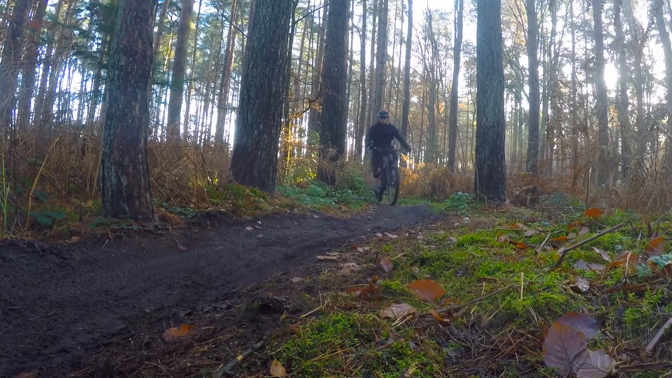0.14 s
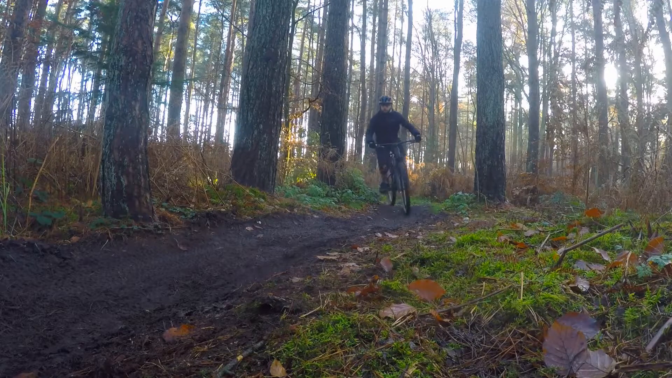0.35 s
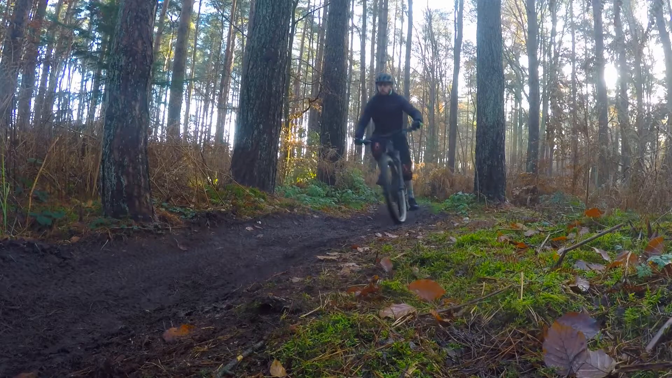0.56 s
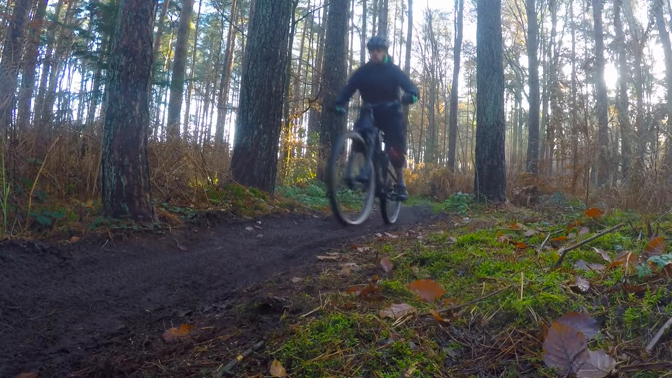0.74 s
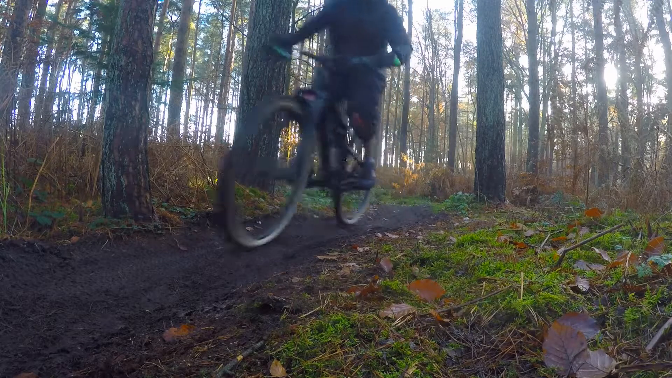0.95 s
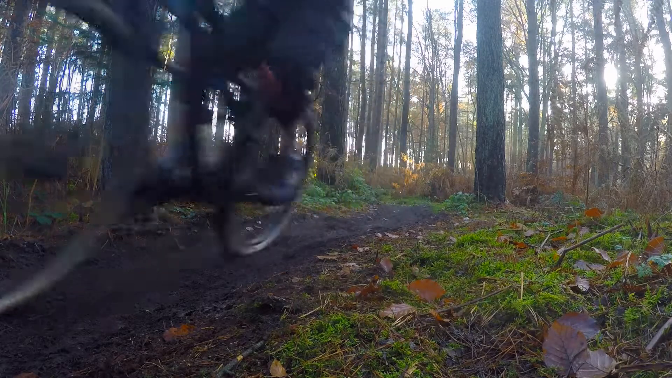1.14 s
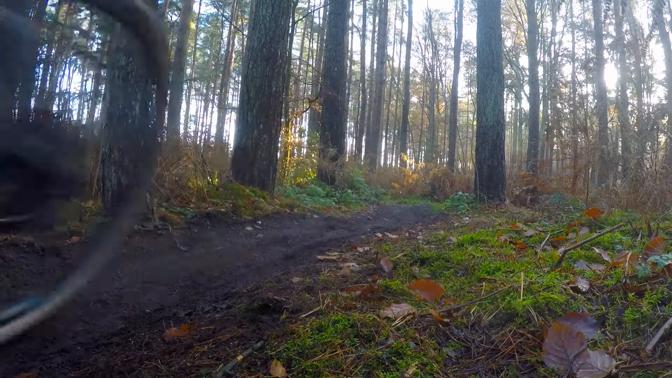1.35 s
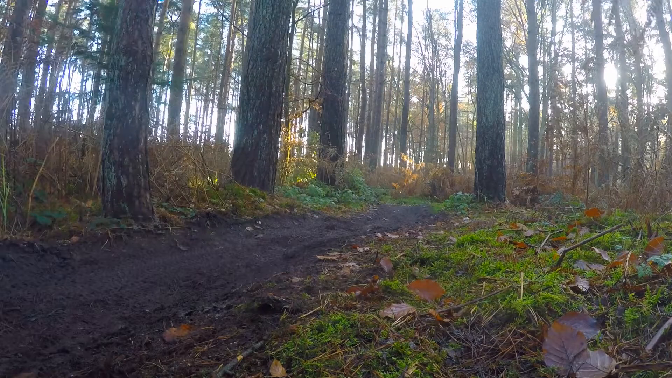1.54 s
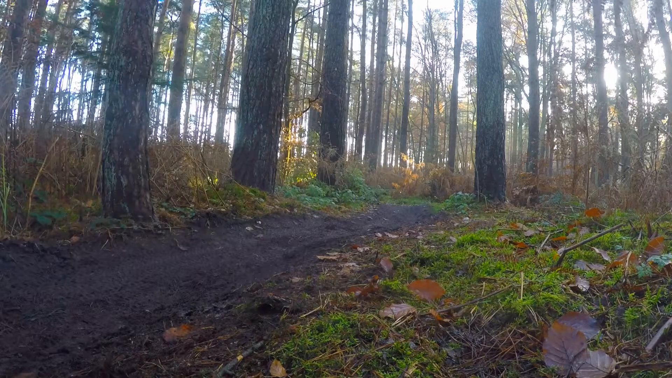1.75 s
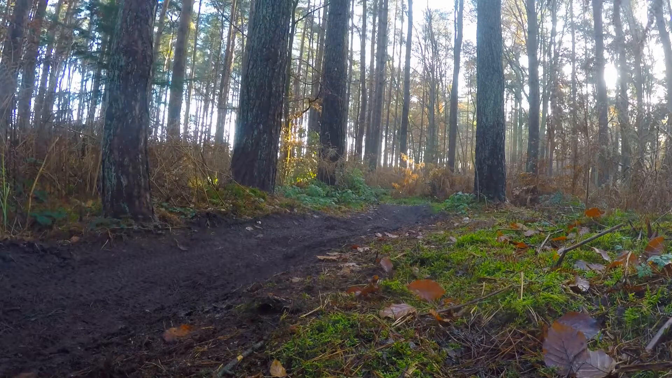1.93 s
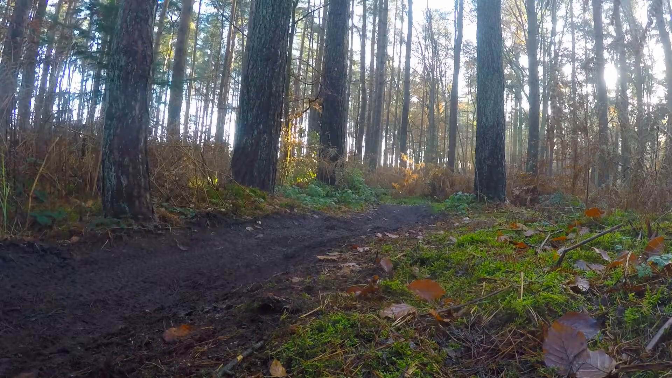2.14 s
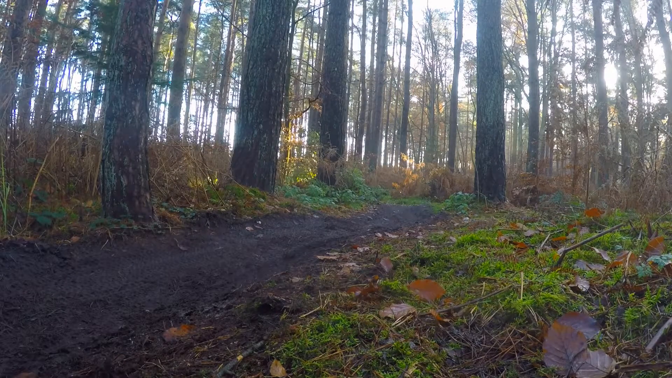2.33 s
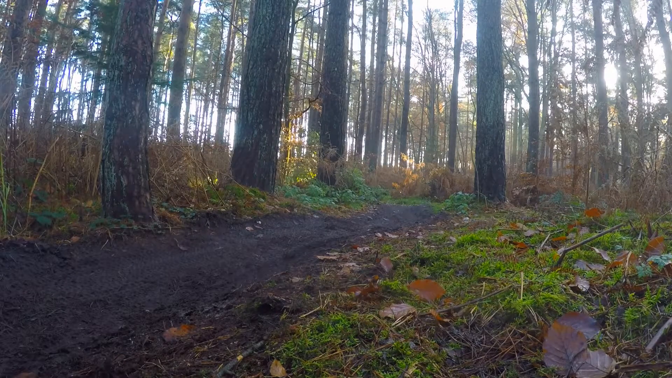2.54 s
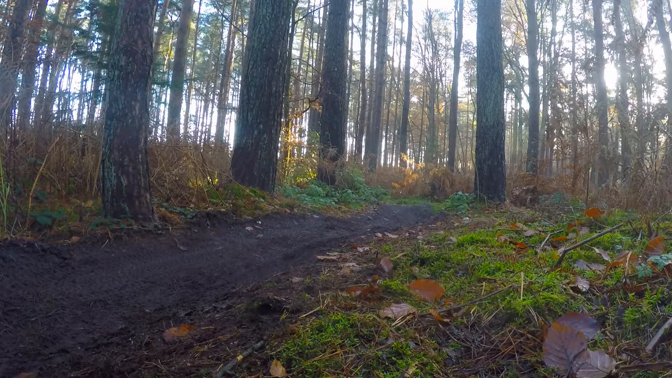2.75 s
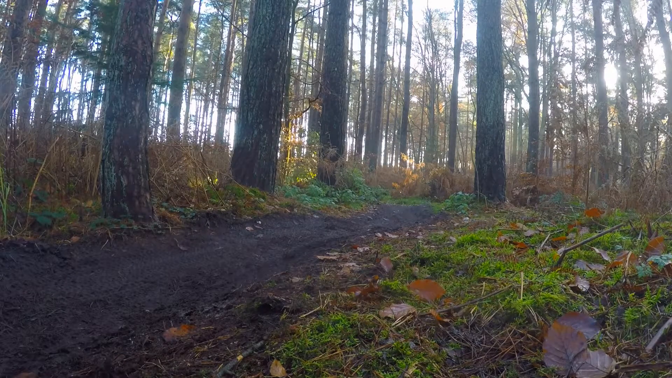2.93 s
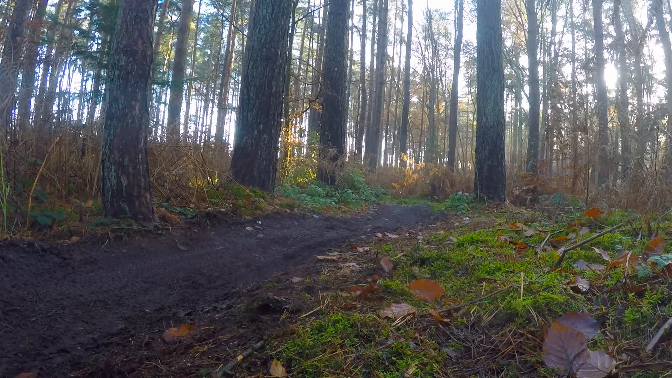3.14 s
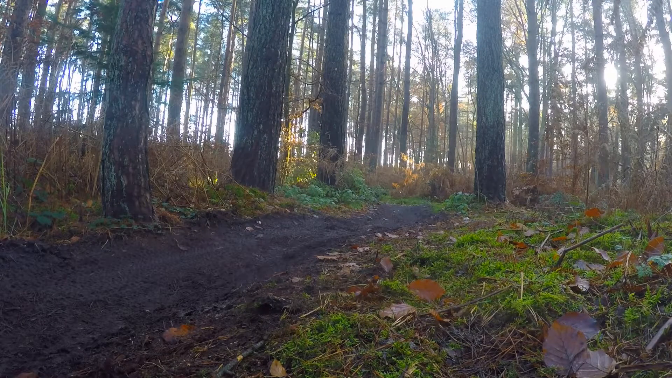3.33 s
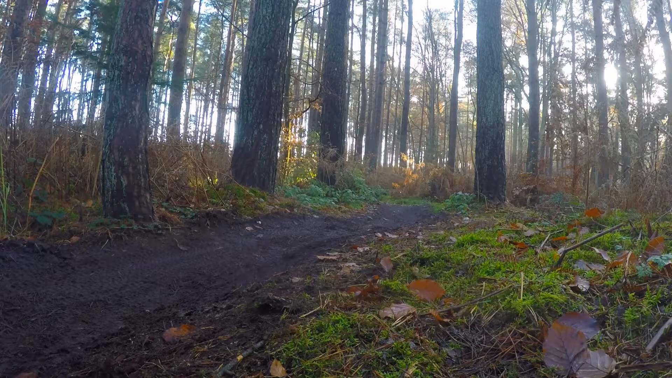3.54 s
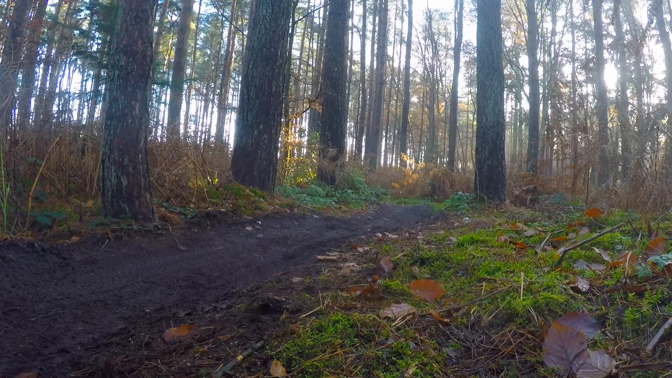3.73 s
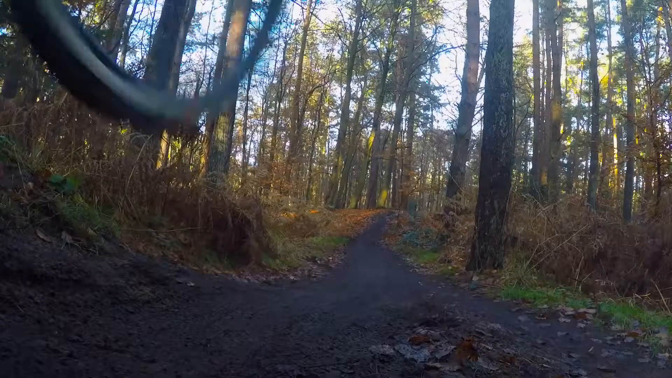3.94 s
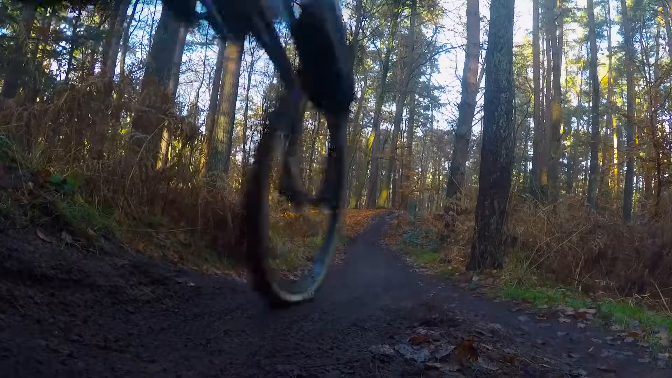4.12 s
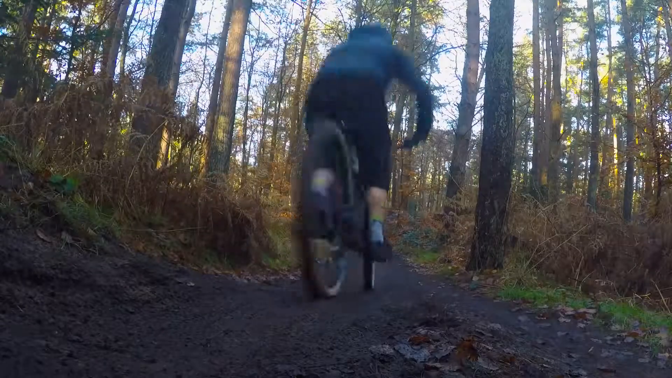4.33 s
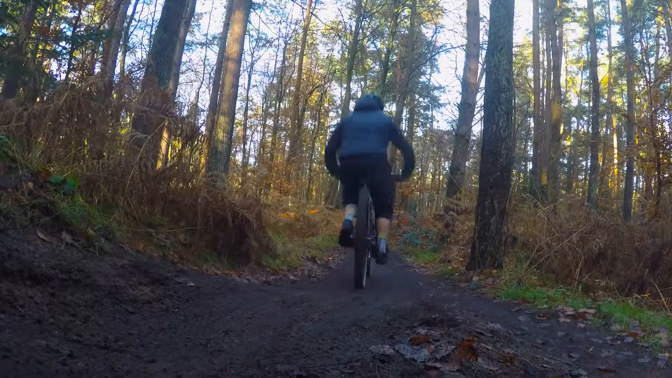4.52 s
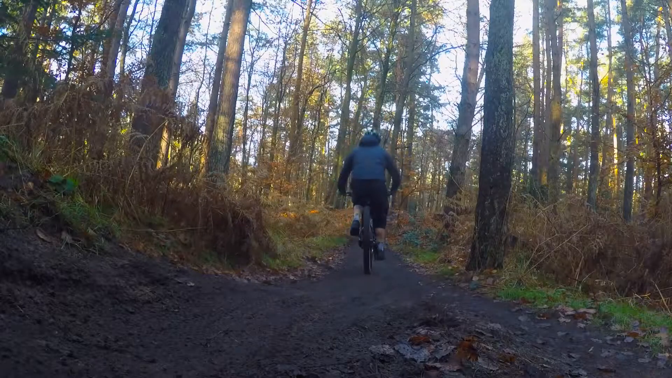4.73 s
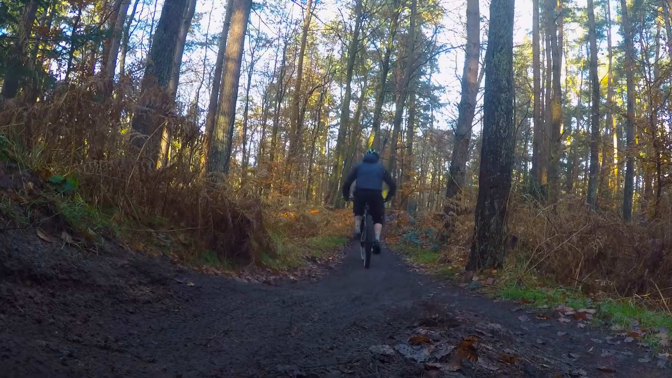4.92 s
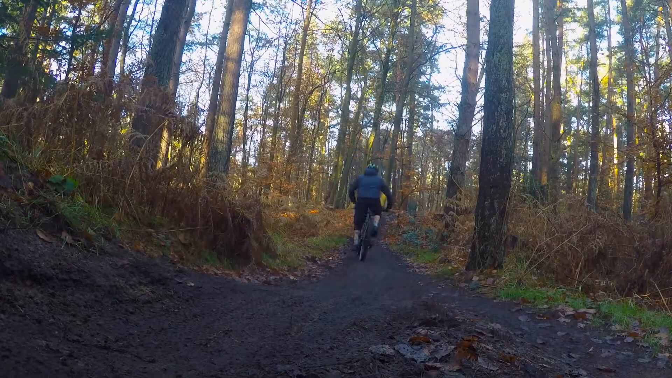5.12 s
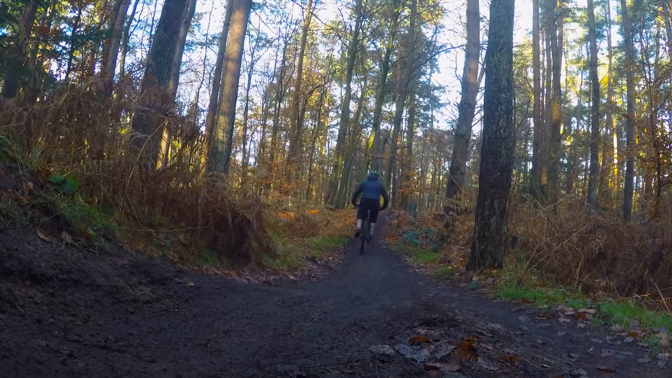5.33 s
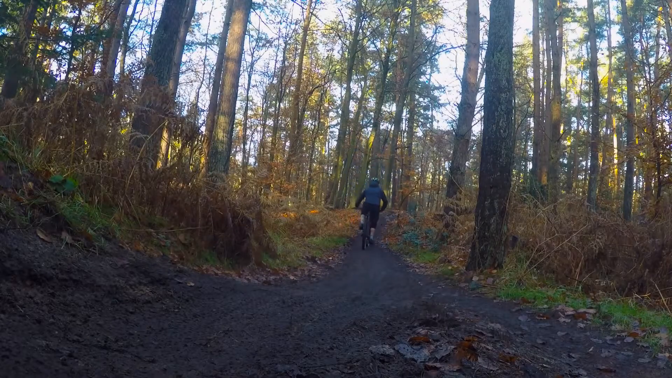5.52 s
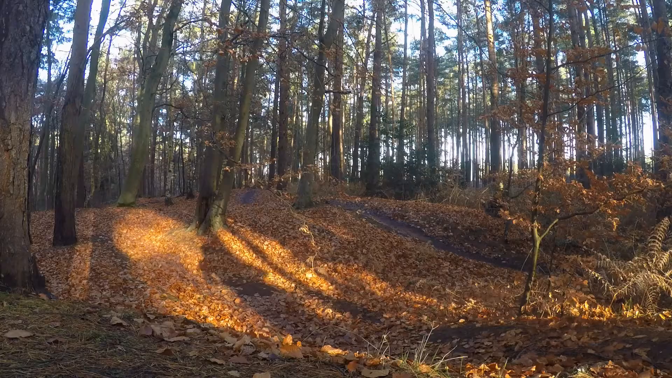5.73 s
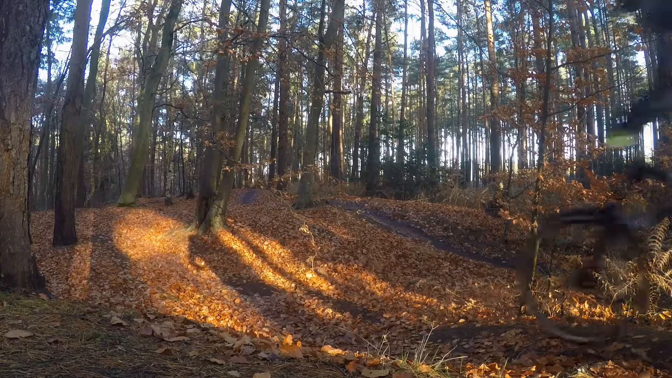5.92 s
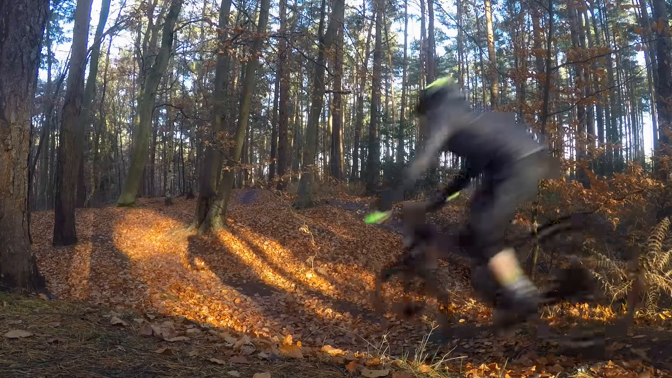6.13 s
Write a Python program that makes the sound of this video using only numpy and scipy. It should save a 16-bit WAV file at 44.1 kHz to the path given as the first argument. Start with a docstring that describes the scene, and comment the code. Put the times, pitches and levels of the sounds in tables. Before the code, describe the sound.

A mountain bike coasts toward a microphone beside a dirt forest trail and passes close, tyres humming and crunching, freehub ticking fast, chain rattling over bumps. A twig cracks as it fades. A second pass lands a jump with two heavy thumps and clatters away, then a quieter third pass ticks by. Wind buffets the microphone over a soft woodland hiss, with a light echo from the trees.

```python
"""Mountain bike on a forest trail

A camera microphone lies beside a dirt trail; a bike coasts past three times, 1.4 to 3 m away.
The freehub ratchets, the tyres hum and crunch, bumps and a landing thump the soil and rattle
chain and frame. Trunks scatter the sound back; air buffets the microphone and the camera whines faintly."""
import sys
import numpy as np
from scipy import signal
from scipy.fft import rfft, irfft, next_fast_len
from scipy.io import wavfile
from scipy.ndimage import uniform_filter1d

SR = 44100
rng = np.random.default_rng(int(sys.argv[2]) if len(sys.argv) > 2 else 0)


def int16_out(signal):
    """Quantize to a 16-bit WAV file."""
    q = np.round(np.clip(np.atleast_2d(signal).T, -1, 1) * 32767)
    wavfile.write(sys.argv[1], SR, q.astype(np.int16))


N = 276451
T = np.arange(N) / SR
SPEED_M_S = 5.33

# camera electronics: f/Hz, level/dB
WHINE = [(8600, -76), (8650, -72)]
# soft hiss of the wood: t/s, level/dB
HISS_LEVEL = [(0, -65.5), (1, -62), (2.6, -61.5), (3.8, -59), (4.8, -54), (5.75, -53), (5.8, -63),
              (6.27, -62)]
# eddies at the microphone: t/s, half length/s, level/dB
GUSTS = [(1.55, 0.14, -37.5), (4.918, 0.04, -21), (5.037, 0.063, -30.5), (5.35, 0.025, -34),
         (5.61, 0.063, -23.5), (6.253, 0.043, -34.5)]
# spectra of the wood's hiss, wind on the microphone and trunk echoes: f/Hz, level/dB
HISS_COLOUR = [(300, -3), (600, -8), (850, -4), (1100, 0), (1900, -2.5), (3000, -6), (3350, -15),
               (5200, -14.5), (5800, -24), (8000, -33), (15000, -40)]
BUFFET_COLOUR = [(12, -10), (25, 0), (50, -1), (70, -5.5), (110, -20), (180, -21), (400, -49.5),
                 (1000, -104)]
ECHO_COLOUR = [(60, -18), (200, -17), (370, 0), (620, 2.5), (900, -12), (3000, -15.5), (6000, -4.5),
               (15000, -16)]

# passes: start t/s, nearest t/s, distance to the microphone/m, hum/dB, grit/dB, breeze/dB
PASSES = [(0, 1.481, 1.7, -35.5, -42.5, -44), (3.92, 4.12, 1.39, -38, -48.5, -33.5),
          (5.771, 5.92, 3, -46, -55.5, -45.5)]
# spectra of tyre hum, ground crumbs and singing tread: f/Hz, level/dB
HUM_COLOUR = [(60, 2), (120, 5.5), (200, 1), (380, -1), (470, -7.5), (560, -14.5), (800, -26),
              (1500, -25.5), (4000, -42)]
GRIT_COLOUR = [(300, -5), (700, 3), (1500, -4), (2100, -2), (2850, 6), (3500, -2), (4700, 0.5),
               (5900, -6.5), (6600, -6.5), (8700, -14), (10800, -13), (15000, -15)]
TREAD_COLOUR = [(110, 1.5), (200, -6), (350, 3), (440, 4.5), (550, -15.5), (660, -17), (800, -23.5),
                (1400, -22)]
# patches of firm soil: t/s, half length/s, level/dB, knob rate/Hz, glide/(Hz/s)
FIRM_PATCHES = [(.66, .11, -44, 126, -5), (1.379, .22, -44.5, 118, -12), (1.97, .15, -43, 111, -8),
                (4.305, .028, -37, 172, 501), (4.492, 0.0202, -29, 190, 99.5),
                (4.581, .025, -38, 220, 50.5), (4.731, .035, -37, 185, -700), (4.829, .08, -42.5, 172, -40),
                (5.398, .35, -49.5, 180, 15)]
# twigs cracking and chain slapping: t/s, relative level/dB, centre f/Hz, spread/octaves, length/s
TWIG_CRACKS = [(0.472, -42, 3470, .4, 0.0017), (1.788, -35.5, 9930, 1, 0.013),
               (2.328, -53, 5033, 0.97, 0.03), (2.459, -33.5, 3800, 1.53, 0.0035),
               (4.78, -36.5, 4000, 0.8, 0.0073), (5.083, -48, 7220, 1.11, 0.0012),
               (5.273, -39.5, 6870, 1.3, .004)]
CHAIN_SLAPS = [(1.684, -33.5, 3000, 1.5, .016), (1.781, -26, 2380, 0.93, 0.018),
               (1.807, -38, 1470, 1.2, 0.028), (4.197, -36.5, 900, 1.68, 0.0045),
               (4.224, -33, 1550, 1.2, 0.0023), (4.355, -33, 3263, 0.29, .011),
               (4.378, -28, 1000, 2.1, 0.028), (4.4, -32, 4620, .27, 0.017),
               (5.118, -20, 1435, 0.19, 0.0025), (5.155, -32.5, 1170, 1.9, 0.042),
               (5.174, -22.5, 2250, 0.28, 0.0035), (5.215, -34, 1281, 0.28, 0.013),
               (6.207, -43.5, 920, 1.4, 0.029)]
# wheels striking the ground: t/s, relative thud/dB, relative tyre ring/dB, contact cutoff f/Hz
BUMPS = [(1.48, -26, -28, 400.3), (1.528, -24.5, -22.5, 505), (1.686, -26.5, -13, 283),
         (1.787, -37, -17.5, 1230), (1.798, -38, -9, 1100), (4.049, -43.5, -28.5, 590),
         (4.090, -43, -34, 600), (4.200, -9.5, -22.5, 447), (4.229, -47, -10, 410), (4.381, -4, -7, 604),
         (5.120, -27, -11.5, 697), (5.162, -43, -9, 620), (5.222, -36, -21.5, 600), (6.198, -34, -25, 500),
         (6.228, -40, -16.5, 500)]
# modes of the soil, the tyre with its frame, and the rim: f/Hz, relative level/dB, t60/s
SOIL_MODES = [(47.9, 3.5, 0.23), (66.6, -9, 0.2586), (92, -1.5, 0.04), (161.5, -7.5, 0.041)]
TYRE_MODES = [(178, -6.5, 0.066), (254.4, 2, 0.079), (316, 9.5, 0.051), (368, 4, 0.032),
              (424.5, 3.5, 0.096), (542, -5.5, 0.08), (685, -17, 0.35)]
RIM_MODES = [(1268, 1, .09), (1930.6, -4.5, 0.097), (2590, -3, 0.01), (4300, -7, 0.046),
             (10640, 6.5, 0.022)]
# resonances of the rattling frame and of hub and wheel: f/Hz, width/Hz, level/dB
FRAME_PEAKS = [(770, 360, -1.5), (1096, 46, -0.5), (1284, 30, -6.5), (1630, 95, -9), (1788, 78, 0.5),
               (2111, 37, -5), (2310, 53, -1), (2560, 170, -4.5), (2890, 32, 3.5), (4630, 620, -6)]
HUB_PEAKS = [(2770, 110, 2.5), (3040, 94, 2), (3670, 230, -5.5), (4110, 250, -1), (4880, 180, -6.5),
             (5220, 120, -3), (6360, 270, -5.5), (7500, 1400, -23.5), (10590, 170, -7.5),
             (11100, 2100, -14), (13200, 530, -19), (14100, 390, -23)]

# freehub curves, one for each stretch of coasting: t/s, click rate/Hz, relative level/dB
FIRST_PASS = [(0.764, 30.2, -43.5), (0.9, 42.0, -47), (1.15, 61.4, -39.5), (1.25, 43.1, -34.5),
              (1.33, 36.8, -37.5), (1.44, 56.7, -28), (1.51, 117.6, -20), (1.58, 71, -17.5),
              (1.69, 21.4, -21.5)]
FAR_OFF = [(2.644, 74.5, -46), (2.72, 120, -46.5), (2.85, 59.9, -50), (3.3, 52.1, -51.5),
           (3.9, 56.1, -56.5)]
JUMP = [(3.929, 43, -23.5), (3.965, 65, -22.5), (4.02, 31.4, -23.5), (4.11, 39.4, -22), (4.17, 40.9, -24),
        (4.22, 23.2, -26), (4.335, 16.4, -36.5)]
RIDING_AWAY = [(4.46, 45, -32), (4.6, 48.26, -41), (4.77, 39.9, -44)]
LAST_PASS = [(5.834, 37.6, -36), (5.86, 58.95, -36.5), (5.97, 66.1, -33.5), (6.06, 61.1, -34.5),
             (6.27, 63.5, -34.5)]
# tone of each stretch: curve, top octave/dB, ping f/Hz, ping sag/(Hz/s), rim ring/dB, shiver/dB
STRETCHES = [(FIRST_PASS, 2.5, 4730, 25.4, -22, -17), (FAR_OFF, 2.1, 4640, 10, -17, -9.5),
             (JUMP, 0, 4705, 820, -17, -18), (RIDING_AWAY, 1.8, 4500, 30, -21, -15),
             (LAST_PASS, 5.25, 4570, 70, -2, -15.5)]


def undb(db):
    """Decibels to gain."""
    return 10 ** (np.asarray(db) / 20)


def unit(x):
    """Scale to rms 1."""
    return x / np.sqrt(np.mean(x ** 2))


def hump(s, half_s):
    """A smooth rise and fall around a moment."""
    return np.exp(-((T - s) / half_s) ** 2)


def wander(rate_hz):
    """Smooth random drift with rms 1."""
    hold = max(int(SR / rate_hz), 1)
    steps = rng.standard_normal(N)[np.arange(N) // hold]
    return unit(uniform_filter1d(uniform_filter1d(steps, hold), hold))


def add(track, s, sound):
    """Mix a sound into a track at a time."""
    i = int(np.clip(s * SR, 0, N - 1))
    track[i:i + len(sound)] += sound[:N - i]


def colour(x, points):
    """Filter by a spectrum of (f/Hz, level/dB) points."""
    hz, db = np.transpose(points)
    size = next_fast_len(len(x))
    f = np.maximum(np.fft.rfftfreq(size, 1 / SR), 1)
    gain = undb(np.interp(np.log(f), np.log(hz), db))
    return irfft(rfft(x, size) * gain, size)[:len(x)]


def noise(points, size=N):
    """Noise of a given spectrum, rms 1."""
    return unit(colour(rng.standard_normal(size), points))


def resonate(x, peaks):
    """Pass a sound through parallel resonances."""
    return sum(undb(db) * signal.lfilter(*signal.iirpeak(hz, hz / width, fs=SR), x)
               for hz, width, db in peaks)


def ring(modes, size=SR // 2):
    """Response of decaying modes to one push, peak 1."""
    t = T[:size]
    y = sum(undb(db - 60 * t / t60) * np.sin(2 * np.pi * hz * t) for hz, db, t60 in modes)
    return y / np.abs(y).max()


def camera(self_noise_db=-69):
    """The electronics whine thinly over the microphone's own white noise."""
    whine = sum(np.sqrt(2) * undb(db) * np.sin(2 * np.pi * hz * T) for hz, db in WHINE)
    return whine + undb(self_noise_db) * rng.standard_normal(N)


def air(breeze_db, gust_db=1.5, rustle_db=0.96):
    """Breeze and eddies rumble right on the microphone; the wood hisses softly around it."""
    wind = undb(breeze_db) + sum(undb(db) * hump(s, half_s) for s, half_s, db in GUSTS)
    rumble = noise(BUFFET_COLOUR) * undb(gust_db * wander(8.8))
    hiss = noise(HISS_COLOUR) * undb(rustle_db * wander(5.46))
    return rumble * wind + hiss * undb(np.interp(T, *np.transpose(HISS_LEVEL)))


def trunks(x, echo_db=-14, build_s=0.071, t60=1.1, grain_db=5):
    """Trunks around the trail each send back a small echo; together they build up and die away."""
    t = T[:SR]
    echoes = rng.standard_normal(SR) * undb(grain_db * rng.standard_normal(SR))
    echoes *= (1 - np.exp(-(t / build_s) ** 2)) * undb(-60 * t / t60)
    echoes = colour(echoes / np.linalg.norm(echoes), ECHO_COLOUR)
    return undb(echo_db) * signal.fftconvolve(x, echoes)[:N]


def ride(hum_ahead_db=-3, grit_ahead_db=-9, undergrowth_db_m=0.22):
    """Nearness to the microphone (1 at each closest point) and the dB of hum, grit and breeze."""
    passes = np.array(PASSES)
    current = np.searchsorted(passes[1:, 0], T)
    _, nearest_s, closest_m, hum_db, grit_db, breeze_db = passes[current].T
    along_m = SPEED_M_S * (T - nearest_s)
    distance_m = np.hypot(closest_m, along_m)
    ahead = np.maximum(-along_m / distance_m, 0)  # tyres throw their sound backwards
    soaked_db = undergrowth_db_m * np.maximum(along_m, 0)  # undergrowth absorbs the departing hum
    airborne_db = -6 * hump(4.227, 0.12)  # the tyres go quieter over the jump
    hum_db = hum_db + hum_ahead_db * ahead - soaked_db + airborne_db
    grit_db = grit_db + grit_ahead_db * ahead + airborne_db
    return closest_m / distance_m, hum_db, grit_db, breeze_db


def tyres(near, hum_db, grit_db, flutter_db=2, patchy_db=1.96, crumb_db=2, grit_falloff=1.854):
    """Tyres rumble on packed earth and grind damp crumbs; the grit fades faster with distance."""
    hum = noise(HUM_COLOUR) * undb(hum_db + flutter_db * wander(25))
    crumbs = rng.standard_normal(N) * undb(crumb_db * wander(900))
    grit = unit(colour(crumbs, GRIT_COLOUR)) * undb(grit_db + patchy_db * wander(60))
    return hum * near + grit * near ** grit_falloff


def tread(wobble=0.03995, flutter_db=5.0, rumble_db=-6, harmonics=7):
    """On each firm patch the evenly spaced knobs sing a rough, low note that wavers with the ground."""
    gains = np.array([undb(db) * hump(s, half_s) for s, half_s, db, _, _ in FIRM_PATCHES]) + 1e-12
    rates = [hz + glide * np.clip(T - s, -2 * half_s, 2 * half_s)
             for s, half_s, _, hz, glide in FIRM_PATCHES]
    knob_hz = np.average(rates, axis=0, weights=gains) * (1 + wobble * wander(60))
    phase = 2 * np.pi * np.cumsum(knob_hz) / SR
    note = sum(np.sin(k * phase + 2 * np.pi * rng.random()) * undb(flutter_db * wander(30))
               for k in range(1, harmonics + 1))
    rumble = undb(rumble_db) * noise(HUM_COLOUR)
    return (unit(colour(note, TREAD_COLOUR)) + rumble) * gains.sum(axis=0)


def flurry(hz, spread, length_s, grain_db=3, skirt_db=-17):
    """Dense hard contacts, and the time elapsed beyond length_s to drive their decay."""
    t = T[:SR // 4]
    f = np.geomspace(100, SR / 2, 60)
    contacts = rng.standard_normal(len(t)) * undb(grain_db * rng.standard_normal(len(t)))
    # the struck part answers in one band, over a faint wide crackle
    octaves = np.log2(f / hz)
    band = 1 / (1 + (octaves / spread) ** 4) + undb(skirt_db) / (1 + octaves ** 2 / 2)
    spectrum = np.column_stack([f, 20 * np.log10(band)])
    return unit(colour(contacts, spectrum)), np.maximum(t - length_s, 0)


def twigs(gain_db=-5.5, fall_s=0.005, tail_db=-19, tail_s=0.073):
    """Twigs and stones crack drily under the tyres and settle in the litter."""
    out = np.zeros(N)
    for s, db, hz, spread, length_s in TWIG_CRACKS:
        contacts, after = flurry(hz, spread, length_s)
        envelope = np.exp(-after / fall_s) + undb(tail_db) * np.exp(-after / tail_s)
        add(out, s, undb(db + gain_db) * contacts * envelope)
    return out


def chain(fall_s=0.0063, buzz_db=-11, buzz_s=0.079, direct=0.34):
    """The chain slaps and shakes the frame, which goes on buzzing."""
    out = np.zeros(N)
    for s, db, hz, spread, length_s in CHAIN_SLAPS:
        contacts, after = flurry(hz, spread, length_s)
        crack = contacts * np.exp(-after / fall_s)
        buzz = contacts * undb(buzz_db) * np.exp(-after / buzz_s)
        add(out, s, undb(db) * (direct * crack + resonate(crack + buzz, FRAME_PEAKS) / 2))
    return out


def bumps(soil_rise_s=0.0017, soil_db=3, scuff_db=-18, scuff_s=0.037, rebound_s=0.019, rebound_db=-9):
    """A wheel hits: the soft soil gives way and swings, the tyre rings, scuffs and rebounds."""
    out, t = np.zeros(N), T[:SR // 2]
    thud = -ring(SOIL_MODES) * (1 - np.exp(-t / soil_rise_s)) * undb(soil_db)
    modes = -ring(TYRE_MODES)
    for s, thud_db, tyre_db, cutoff_hz in BUMPS:
        scuff = undb(scuff_db) * noise(HUM_COLOUR, len(t)) * np.exp(-t / scuff_s)
        # a softer contact leaves the higher modes still
        tyre = undb(tyre_db) * signal.lfilter(*signal.butter(2, cutoff_hz, fs=SR), modes + scuff)
        add(out, s, undb(thud_db) * thud + tyre)
        add(out, s + rebound_s * (1 + 0.205 * rng.uniform(-1, 1)), undb(rebound_db) * tyre)
    return out


def pawl(top_db, ping_hz, rim_db, shiver_db, snap_s=0.0021, shiver_s=0.028, direct_db=-21,
         ping_db=-9, ping_s=0.0024, tooth_db=2.5):
    """A pawl drops into its tooth: a hard snap, a ping from the hub, a shiver through spokes and rim."""
    t = T[:SR // 20]
    rise = 1 - np.exp(-t / 0.0005)
    envelope = rise * (np.exp(-t / snap_s) + undb(shiver_db) * np.exp(-t / shiver_s))
    click = envelope * rng.standard_normal(len(t))
    top_octave = signal.lfilter(*signal.butter(2, 8000, "high", fs=SR), click)
    click += (undb(top_db) - 1) * top_octave
    # no two teeth ring quite alike
    hz = ping_hz * (1 + 0.018 * rng.standard_normal())
    ping = rise * np.exp(-t / ping_s) * np.sin(2 * np.pi * (hz * t + rng.random()))
    rim = ring(RIM_MODES, len(t)) * rng.uniform(0, 1)
    hub = [(centre, width, db + tooth_db * rng.standard_normal()) for centre, width, db in HUB_PEAKS]
    return resonate(click, hub) + undb(direct_db) * click + undb(ping_db) * ping + undb(rim_db) * rim


def freehub(gain_db=2.5, scatter_db=1.67, low_cut_hz=2000):
    """The pawls click once for every tooth that slips by as the rear wheel coasts."""
    clicks = np.zeros(N)
    for curve, top_db, ping_hz, sag, rim_db, shiver_db in STRETCHES:
        s, rate_hz, db = np.transpose(curve)
        t = T[(T >= s[0]) & (T <= s[-1])]
        teeth = np.floor(np.cumsum(np.interp(t, s, rate_hz)) / SR)
        for when in t[np.diff(teeth, prepend=-1) > 0]:
            gain = undb(np.interp(when, s, db) + gain_db + scatter_db * rng.standard_normal())
            add(clicks, when, gain * pawl(top_db, ping_hz - sag * (when - s[0]), rim_db, shiver_db))
    # so small a body radiates no bass
    return signal.sosfilt(signal.butter(2, low_cut_hz, "high", fs=SR, output="sos"), clicks)


def scene():
    """Mono, from the trail's edge: camera noise, air, forest echo and the passing bike."""
    near, hum_db, grit_db, breeze_db = ride()
    noise_floor = camera()
    bike = tyres(near, hum_db, grit_db) + tread() + bumps() + chain() + twigs() + freehub()
    return (bike + trunks(bike) + air(breeze_db) + noise_floor)[None]


def record(dry, low_hz=12, top_hz=15400):
    """The camera cuts the deepest rumble and the top."""
    dry = signal.sosfilt(signal.butter(1, low_hz, "high", fs=SR, output="sos"), dry)
    return signal.sosfilt(signal.ellip(10, 0.2, 80, top_hz, fs=SR, output="sos"), dry)


dry = scene()
out = record(dry)
int16_out(out)
```